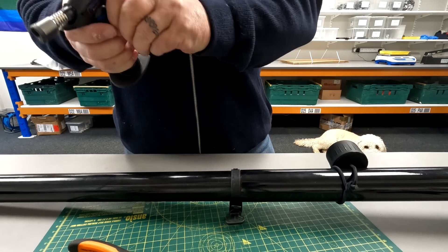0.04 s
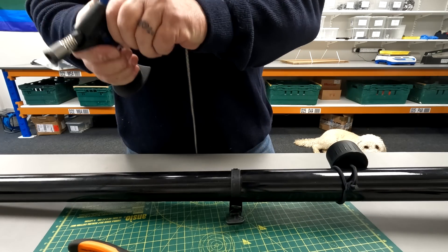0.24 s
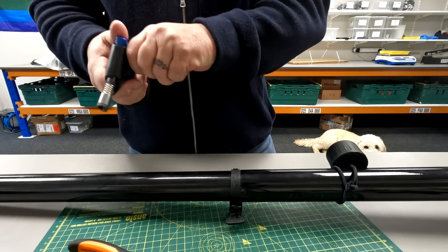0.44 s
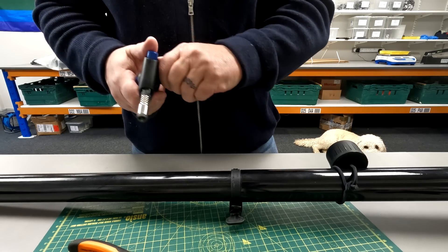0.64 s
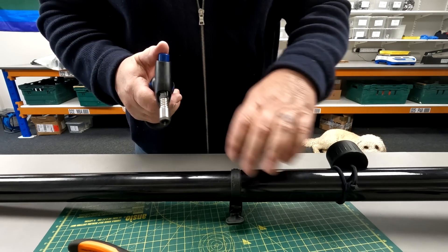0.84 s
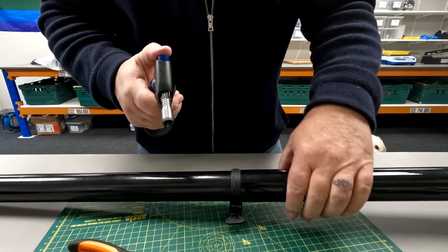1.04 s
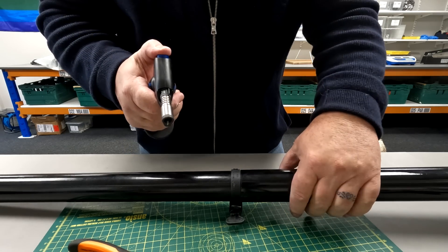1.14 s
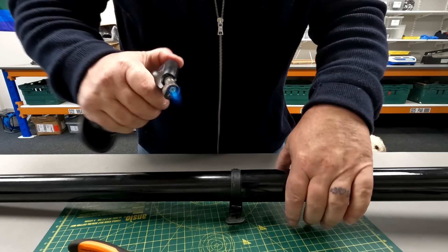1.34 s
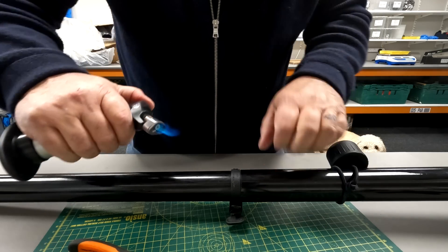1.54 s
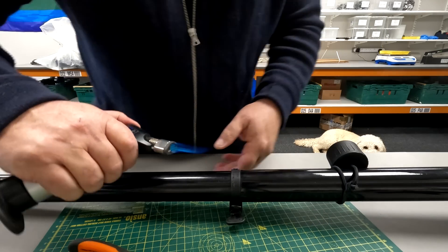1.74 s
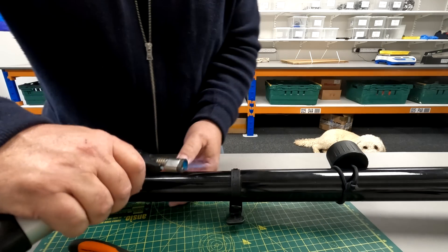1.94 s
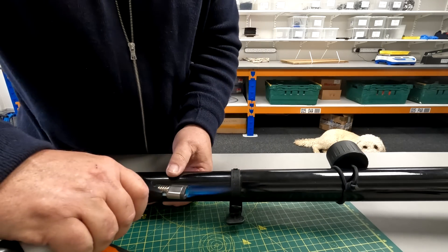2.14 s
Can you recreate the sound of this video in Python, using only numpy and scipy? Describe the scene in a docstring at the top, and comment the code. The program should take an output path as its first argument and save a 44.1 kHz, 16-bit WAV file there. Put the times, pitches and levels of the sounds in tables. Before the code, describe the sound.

A small gas torch is handled with faint rubs and ticks, gas starts softly, the igniter snaps twice, and the flame pops alight, hissing and rumbling as it swings onto a pipe in a quiet workshop, heard close.

```python
"""At a workbench, a small butane torch is lit close to the microphone.
Fingers rub and tick on its case: noise bursts ring the modes of the body. The valve opens and gas sings
softly in the nozzle, then hisses harder: noise through moving resonances. The igniter snaps twice, the gas
catches with a pop, and the flame, shaped noise, hisses and rumbles as it is swung onto a plastic pipe."""
import sys
import numpy as np
from scipy import signal
from scipy.fft import rfft, irfft
from scipy.io import wavfile
from scipy.ndimage import uniform_filter1d, map_coordinates

SR = 44100
rng = np.random.default_rng(int(sys.argv[2]) if len(sys.argv) > 2 else 0)


def persist_wave(psi):
    """Save psi, clipped to +-1, as 16-bit WAV."""
    counts = np.round(np.clip(psi, -1, 1) * 32767).astype(np.int16)
    wavfile.write(sys.argv[1], SR, np.atleast_2d(counts).T)


N = 96534
T, HZ = np.arange(N) / SR, np.fft.rfftfreq(N, 1 / SR)
POP_S = 1.3178  # the gas catches

# Modes of the torch body: (frequency [Hz], relative level [dB], t60 [s])
BODY_MODES = [(916, -17, 0.045), (1016, -17.5, 0.027), (1345, -4, 0.036), (1453, -7, 0.024),
              (1657, -9.5, .02), (2800, -19, 0.0076), (3350, -11, 0.024), (3660, -11, 0.0091),
              (4370, -19, 0.0047), (5460, -13, 0.0078), (6026, 0, 0.013), (6380, -23, 0.025),
              (7270, -18, 0.02), (7685, -10, 0.016)]
# Colour of a sharp crack: (frequency [Hz], relative level [dB])
CRACK_COLOUR = [(100, -20), (450, -20), (740, -24), (980, -12.5), (1130, -19), (1400, -0.5), (2100, -4),
                (3000, 1.5), (3600, 3), (4050, -4), (4700, 0), (6100, 4), (6700, -3.5), (7700, 0.5),
                (8600, -4), (11000, -4.5), (15500, -8.5)]


def amp(db):
    """Decibels to gain."""
    return 10 ** (np.asarray(db) / 20)


def unit(x):
    """Scales to rms 1."""
    return x / np.sqrt(np.mean(x ** 2) + 1e-20)


def read(points, hz):
    """Reads a spectrum on a log-frequency axis."""
    f, value = np.transpose(points)
    return np.interp(np.log(hz + 1), np.log(f + 1), value)


def curves(rows):
    """One curve over time for each column after the first, which is time."""
    s, *columns = np.transpose(rows)
    return [np.interp(T, s, c) for c in columns]


def noise(gain, flutter_db=0, flutter_hz=30):
    """Stereo noise of a given spectrum and rms 1, its level fluttering at random."""
    # Left-right likeness of noise at the microphone: (frequency [Hz], correlation [-1 to 1])
    likeness = [(30, .98), (120, 0.96), (300, 0.89), (700, 0.2), (1600, 0.53), (4300, 0.48), (9000, 0.45),
                (15000, 0.05)]
    a, b, c = rfft(rng.standard_normal((3, N)))
    same = np.clip(read(likeness, HZ), -1, 1)
    mid, side = a * np.sqrt(1 + same), b * np.sqrt(1 - same)
    flutter = unit(irfft(c / (1 + (HZ / flutter_hz) ** 2), N))
    stereo = irfft(np.array([mid + side, mid - side]) * gain, N)
    return unit(stereo * amp(flutter_db * flutter))


def resonance(hz, width_hz, same=1.0, flutter_db=1):
    """Turbulence ringing in a resonance that follows the curve hz, at rms 1."""
    z = rng.standard_normal((4, N))
    r = np.exp(-np.pi * width_hz / SR)
    # Noise narrowed around 0 Hz, then shifted up to the moving pitch
    mid, side = signal.lfilter([1], [1, -2 * r, r * r], z[:2] + 1j * z[2:])
    same = np.clip(same, -1, 1)
    mid, side = mid * np.sqrt(1 + same), side * np.sqrt(1 - same)
    turn = np.exp(2j * np.pi * np.cumsum(hz * np.ones(N)) / SR)
    stereo = (np.array([mid + side, mid - side]) * turn).real
    flutter = unit(uniform_filter1d(rng.standard_normal(N), size=900))
    return unit(stereo * amp(flutter_db * flutter))


def pan(db):
    """Left and right gains for a level difference, positive to the left."""
    return amp(np.array([[db], [-db]]) / 2)


def add(mix, s, sound):
    """Mixes a sound in at time s."""
    part = mix[:, max(round(s * SR), 0):][:, :sound.shape[1]]
    part += sound[:, :part.shape[1]]


def burst(s, rise_s, decay_s):
    """An envelope that swells up to time s and dies away."""
    return np.exp(-np.where(T < s, (s - T) / rise_s, (T - s) / decay_s).clip(0, 50))


def ring(gains_db, spread=0.48):
    """The body's modes after one blow, reaching each ear a little out of step."""
    hz, db, t60 = np.transpose(BODY_MODES)[:, :, None]
    t = T[:3000]
    start = 2 * np.pi * rng.random((len(BODY_MODES), 1))
    lead = spread * rng.choice([-1, 1], (len(BODY_MODES), 1))  # radians
    phase = start + lead * np.array([1, -1])[:, None, None]
    size = amp(db + gains_db[:, None])
    modes = size * amp(-60 * t / t60) * np.sin(2 * np.pi * hz * t + phase)
    return modes.sum(1) / np.linalg.norm(size)


def thin(x):
    """High-passes the ring, so that its sudden start adds no low thud."""
    return signal.sosfilt(signal.butter(4, 990, "high", fs=SR, output="sos"), x)


def workshop_floor():
    """The workshop's quiet noise and a low steady-pitched hum of varying level."""
    # Colour of the background: (frequency [Hz], relative level [dB])
    floor_colour = [(20, 5.5), (60, 8.5), (110, -7), (300, -7), (500, -18), (900, -22), (1600, -36),
                    (3000, -54), (6000, -21), (10000, -27.5), (12500, -27.5), (15000, -48)]
    # Level of the hum: (time [s], level [dB])
    hum_level = [(0, -49), (.2, -55), (.5, -54.5), (.8, -57), (.97, -67), (1.1, -56), (1.3, -54),
                 (2.189, -45.5)]
    hum_hz, floor_db = 49.8, -61
    hum = amp(curves(hum_level)[0]) * np.sin(2 * np.pi * hum_hz * T)
    return amp(floor_db) * noise(amp(read(floor_colour, HZ))) + hum


def room(x, build_s=0.0061):
    """A reflection off the bench, then the short noise-like tail of the workshop."""
    # Reverberation of the workshop: (frequency [Hz], t60 [s])
    reverb = [(100, 0.22), (500, 0.39), (1500, 0.44), (4000, 0.23), (8000, 0.26), (16000, 0.35)]
    tail_db, tail_delay_s = -18, 0.005
    bench_db, bench_delay_s = -13.5, 0.004
    hz, t, z = signal.stft(rng.standard_normal((2, SR // 2)), SR, nperseg=256)
    decay = amp(-60 * t / read(reverb, hz)[:, None])
    tail = signal.istft(z * decay, SR, nperseg=256)[1]
    tail *= np.clip((T[:tail.shape[1]] - tail_delay_s) / build_s, 0, 1)
    wet = signal.fftconvolve(x, tail / np.linalg.norm(tail[0]), axes=1)[:, :N]
    out = x + amp(tail_db) * wet
    add(out, bench_delay_s, amp(bench_db) * x)
    return out


def glance(x):
    """Adds the bench's reflection, which mostly comes sooner as the torch is lowered."""
    # The torch is lowered toward the bench: (time [s], delay of the bench reflection [s])
    lowering = [(.6, 0.0018), (1.2, 0.0016), (1.5, .0014), (1.75, 0.0012), (2.0, 0.00083), (2.189, 0.00087)]
    echo_gain = amp(-18.5)
    heard_from = T - curves(lowering)[0]
    echo = np.array([map_coordinates(c, [heard_from * SR], order=3) for c in x])
    return (x + echo_gain * echo) / np.sqrt(1 + echo_gain ** 2)


def handling(rise_s=0.00052, grain_db=2):
    """Fingers and sleeve rub as soft noise; small scrapes and clicks ring the torch body."""
    # Fingers and sleeve on the case: (time [s], level [dB])
    rub_level = [(0, -57), (.06, -63), (.11, -68.5), (.15, -64.5), (.2, -71.5), (.23, -74), (.3, -73),
                 (.37, -70.5), (.43, -58.5), (.5, -68), (.58, -69), (.64, -67), (.7, -69), (.8, -92)]
    # Colour of the rubbing: (frequency [Hz], relative level [dB])
    rub_colour = [(200, 4), (900, -10), (1400, -2), (1800, 1.5), (2300, 1), (3300, -0.5), (4500, -0.5),
                  (6200, -6), (9000, -9.5), (13000, -15), (16000, -18)]
    # Clicks of case and valve: (time [s], level [dB], scrape decay [s], treble tilt [dB/octave],
    # centre of the emphasis [Hz], pan [dB])
    ticks = [(.002, -39.5, 0.0038, -6, 4540, 0), (0.034, -42, 0.0049, -3, 4740, -5),
             (.038, -39.5, 0.0048, -4, 6100, 5.5), (0.152, -46.5, 0.0052, -3.5, 4300, -0.5),
             (.172, -53.5, 0.013, -3, 6000, 2), (.186, -46.5, 0.0037, -1, 4040, -1),
             (0.3954, -27, 0.0026, -1.1, 1395, 0.5), (0.409, -43.5, 0.0045, -11.5, 6000, 2),
             (0.421, -41, 0.0024, -6, 4700, 2), (.640, -48.5, 0.0044, -2, 3050, 0),
             (.652, -41.5, 0.0035, 5.5, 6400, 0), (.922, -53, .001, -4, 5500, 2),
             (1.012, -50.5, 0.053, -8.5, 1350, -1)]
    emphasis_db, emphasis_octaves, ring_db = 12.5, 0.38, -16
    rub = noise(amp(read(rub_colour, HZ)), flutter_db=1, flutter_hz=151)
    out = amp(curves(rub_level)[0]) * rub
    mode_hz = np.transpose(BODY_MODES)[0]
    for s, db, decay_s, tilt_db, bright_hz, pan_db in ticks:
        def colour(hz):
            """Tilt and one bright region, in dB."""
            octave = np.log2(np.maximum(hz, 1000) / bright_hz)
            return tilt_db * octave + emphasis_db * np.exp(-(octave / emphasis_octaves) ** 2)
        gain = amp(db) * pan(pan_db)
        grain = noise(amp(read(CRACK_COLOUR, HZ) + colour(HZ)), flutter_db=grain_db, flutter_hz=910)
        out += gain * burst(s, rise_s, decay_s) * grain
        add(out, s, gain * amp(ring_db) * thin(ring(colour(mode_hz))))
    return out


def pings():
    """A small metal part rings on as a decaying sine after light knocks."""
    # Knocks that set the part singing: (time [s], level [dB])
    knocks = [(.039, -43), (.152, -59), (0.177, -51.5)]
    ping_hz, t60_s = 6030, 0.053
    out, t = np.zeros((2, N)), T[:6000]
    for s, db in knocks:
        ping = amp(db - 60 * t / t60_s) * np.sin(2 * np.pi * ping_hz * t)
        add(out, s, ping[None])
    return out


def thumps(attack_s=0.0012):
    """Dull bumps of the hands and of the catching flame: short, low, decaying sines."""
    # Bumps: (time [s], level before attack and decay [dB], frequency [Hz], decay [s])
    bumps = [(1.104, -31, 102, 0.0075), (1.108, -42, 212, 0.021), (1.181, -43, 46, 0.064),
             (1.316, -30.5, 205, 0.017), (1.425, -27.5, 151, .008), (1.68, -37, 57.7, 0.037)]
    out, t = np.zeros((2, N)), T[:6000]
    for s, db, hz, decay_s in bumps:
        envelope = np.exp(-t / decay_s) * (1 - np.exp(-t / attack_s))
        add(out, s, -amp(db) * (np.sin(2 * np.pi * hz * t) * envelope)[None])
    return out


def trickle():
    """Gas at a trickle sings low in the nozzle, turbulence in one narrow resonance with some air."""
    # The soft singing: (time [s], level [dB], nozzle resonance [Hz])
    soft_gas = [(.645, -100, 1850), (.66, -58.5, 1830), (.73, -59, 1890), (.85, -58.5, 1820),
                (1.0, -55.5, 1800), (1.1, -53.5, 1777), (1.17, -57.5, 1790), (1.23, -64, 1780),
                (1.3, -100, 1780)]
    # Colour of its air: (frequency [Hz], relative level [dB])
    soft_colour = [(100, -4), (260, -2), (370, 8), (480, -1.5), (720, -4.5), (900, -9), (1120, -18),
                   (1450, -2.5), (2200, -1.5), (4000, -3), (5500, -13), (9000, -24.5), (16000, -46)]
    level_db, hz = curves(soft_gas)
    singing = resonance(hz, width_hz=137, same=1.0, flutter_db=1)
    air = amp(-2.5) * noise(amp(read(soft_colour, HZ)), flutter_db=.7)
    return amp(level_db) * (singing + air)


def jet():
    """The jet at full flow: broad hiss, with turbulence ringing in higher nozzle resonances."""
    # The jet: (time [s], broad hiss level [dB], nozzle ring level [dB], ring pitch [Hz],
    # top sizzle level [dB]); the ring and sizzle levels each scale a sum of resonances
    full_flow = [(1.06, -100, -100, 4180, -110), (1.13, -60.5, -57.5, 4230, -77),
                 (1.22, -48.5, -48, 4250, -66), (1.3, -44, -52, 4256, -59), (1.38, -51.5, -58.5, 4280, -53),
                 (1.49, -53.5, -66, 4190, -57.5), (1.57, -52.5, -51, 4212, -54),
                 (1.66, -52, -50, 4290, -55), (1.73, -50, -51.5, 4350, -54), (1.81, -50, -51.5, 4356, -54),
                 (1.89, -50, -54, 4316, -51), (1.97, -49.5, -41, 4250, -53), (2.06, -48, -44, 4354, -55),
                 (2.12, -49, -50, 4500, -56), (2.189, -48, -53.5, 4450, -55)]
    # Colour of the broad hiss: (frequency [Hz], relative level [dB])
    hiss_colour = [(300, -4), (1000, -8.5), (2100, -6), (3000, -1), (4000, 3.5), (4800, 5), (5300, 0),
                   (6200, 3), (7200, -4), (8300, -5), (9500, -3), (10600, -12.5), (12300, -8), (14000, -8),
                   (16000, -4.5)]
    # A higher shoulder of the hiss as the jet nears the pipe: (time [s], level [dB], pitch [Hz])
    shoulder_path = [(1.05, -110, 4680), (1.15, -66, 4700), (1.55, -70, 4700), (1.72, -59, 4750),
                     (1.86, -63, 4860), (1.97, -56, 4674), (2.06, -53, 4710), (2.12, -54, 5010),
                     (2.189, -59, 5000)]
    air_db, ring_db, ring_hz, top_db = curves(full_flow)
    air = amp(air_db) * noise(amp(read(hiss_colour, HZ)), flutter_db=0.84) * pan(0.14)

    unlit = T < POP_S
    cold = amp(-11) * unlit * resonance(5290, width_hz=500)  # rings only before the gas is lit
    core = amp(-6) * resonance(ring_hz, width_hz=110, same=0.92, flutter_db=0.7)
    wide = resonance(ring_hz, width_hz=260, same=0.73, flutter_db=0.5)
    nozzle = amp(ring_db) * (core + wide + cold) * pan(.4)

    sizzle = resonance(14600, width_hz=1900, same=0.27, flutter_db=2.0) * pan(0.27)
    overtone = amp(-5.5) * resonance(9170, width_hz=550, same=0.64) * pan(-0.32)
    top = amp(top_db) * (sizzle + overtone)

    shoulder_db, shoulder_hz = curves(shoulder_path)
    shoulder = amp(shoulder_db) * resonance(shoulder_hz, width_hz=570, same=0.43, flutter_db=1)
    return air + shoulder + nozzle + top


def igniter(grain_db=0.5):
    """The trigger gives, then the hammer strikes: each a crack of noise and a short ring of the body."""
    # Snaps: (time [s], crack level [dB], rise [s], decay [s], ring level [dB], centre of the emphasis [Hz],
    # its width [octaves], its strength in the crack [dB], the crack's bass cut [Hz])
    snaps = [(1.2360, -9.5, 0.00033, 0.0023, -4.5, 5720, 0.38, 9, 1010),
             (1.3081, -4, .0007, 0.0024, -7, 7550, 0.32, 5, 196)]
    ring_emphasis_db = 13
    out, mode_hz = np.zeros((2, N)), np.transpose(BODY_MODES)[0]
    for s, crack_db, rise_s, decay_s, ring_db, bright_hz, octaves, emphasis_db, cut_hz in snaps:
        def bright(hz):
            """A bell around the snap's brightest pitch."""
            return np.exp(-(np.log2((hz + 1) / bright_hz) / octaves) ** 2)
        bass_cut = 1 / np.hypot(1, (cut_hz / (HZ + 1)) ** 4)
        colour = amp(read(CRACK_COLOUR, HZ) + emphasis_db * bright(HZ)) * bass_cut
        crack = noise(colour, flutter_db=grain_db, flutter_hz=1500)
        out += amp(crack_db) * burst(s, rise_s, decay_s) * crack
        add(out, s, amp(ring_db) * thin(ring(ring_emphasis_db * bright(mode_hz))))
    return out


def pop(width_s=0.00163, level_db=-20):
    """The gas catches: one smooth pressure pulse, a dip between two smaller swells."""
    u = (T - POP_S) / width_s
    return np.tile(amp(level_db) * (u ** 2 / 2 - 1) * np.exp(-u ** 2 / 4), (2, 1))


def flame():
    """Turbulent low rumble with one flare, and a hollow roar resonating in the burner."""
    # The flame: (time [s], rumble level [dB], hollow roar level [dB], roar pitch [Hz])
    burning = [(1.305, -100, -100, 1555), (1.325, -41, -40, 1533), (1.365, -46.5, -49.5, 1560),
               (1.41, -43.5, -64, 1580), (1.45, -35.5, -70, 1596), (1.53, -41, -74, 1630),
               (1.63, -45.5, -57, 1653), (1.71, -39.5, -62.5, 1625), (1.785, -37, -48.5, 1600),
               (1.87, -47.5, -57, 1560), (1.95, -41, -46, 1573), (2.03, -40, -61, 1517),
               (2.189, -45.5, -73, 1496)]
    # Colour of the rumble: (frequency [Hz], relative level [dB])
    rumble_colour = [(20, -5), (45, 6.5), (80, -2), (130, 1.5), (200, 1.5), (270, -11), (400, -17.5),
                     (600, -26.5), (1000, -31.5), (3000, -45)]
    # Colour of the flare: (frequency [Hz], relative level [dB])
    flare_colour = [(60, -12), (200, -0.5), (480, -0.5), (700, -11), (950, -16), (1300, -17), (2500, -27),
                    (6000, -40)]
    rumble_db, roar_db, roar_hz = curves(burning)
    rumble = amp(rumble_db) * noise(amp(read(rumble_colour, HZ)), flutter_db=1.5)
    flare_envelope = amp(-41) * burst(1.429, rise_s=0.0016, decay_s=0.019)
    flare = flare_envelope * noise(amp(read(flare_colour, HZ)))
    roar = amp(roar_db) * resonance(roar_hz, width_hz=270, same=0.97, flutter_db=0.0)
    return rumble + flare + roar


def flame_on_pipe():
    """The flame washes over the pipe as broad noise and sounds a hollow note as it blows past."""
    # Flame washing over the pipe: (time [s], level [dB])
    wash_level = [(1.6, -78), (1.72, -63), (1.79, -45.5), (1.84, -48.5), (1.89, -48), (1.95, -50),
                  (2.03, -60), (2.189, -63)]
    # Colour of the wash: (frequency [Hz], relative level [dB])
    wash_colour = [(150, -17), (370, 2.5), (700, -0.5), (1000, -15.5), (2000, -15.5), (2600, -10),
                   (5000, -8), (12000, -30)]
    # The hollow note: (time [s], level [dB])
    note_level = [(1.68, -88), (1.74, -69), (1.78, -49), (1.84, -46), (1.88, -62.5), (1.96, -63.5),
                  (2.05, -78)]
    wash = amp(curves(wash_level)[0]) * noise(amp(read(wash_colour, HZ)))
    note = resonance(664, width_hz=15.4, same=1.0, flutter_db=1.5)
    return wash + amp(curves(note_level)[0]) * note


def scene():
    """The torch over the workshop's quiet hum."""
    knocks = handling() + pings() + thumps() + igniter() + pop()
    gas = trickle() + jet()
    return workshop_floor() + room(knocks) + glance(gas) + flame() + flame_on_pipe()


def record(dry):
    """Overload on the sharpest peaks, then the band limit."""
    low_pass = signal.firwin(301, 15900, window=("kaiser", 8), fs=SR)
    return signal.oaconvolve(np.clip(dry, -1, 1), low_pass[None], "same")


dry = scene()
out = record(dry)
persist_wave(out)
```